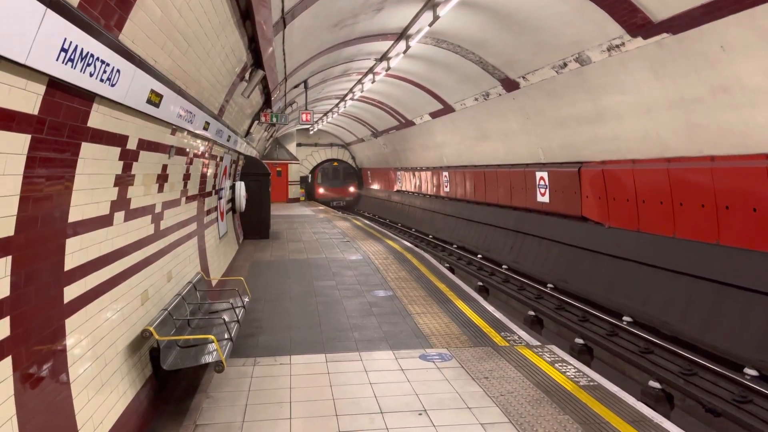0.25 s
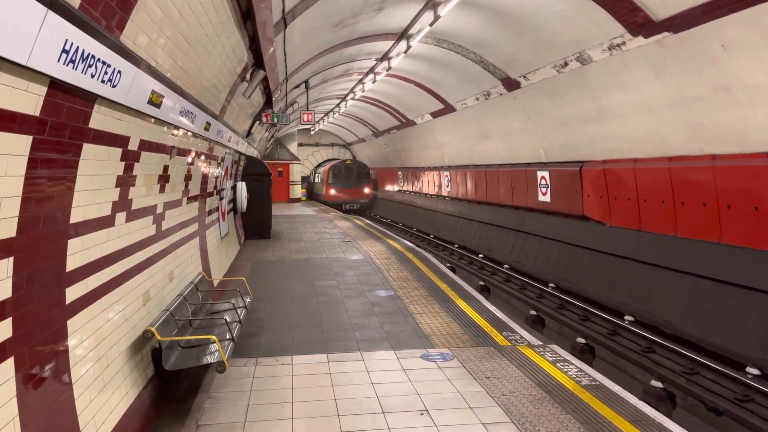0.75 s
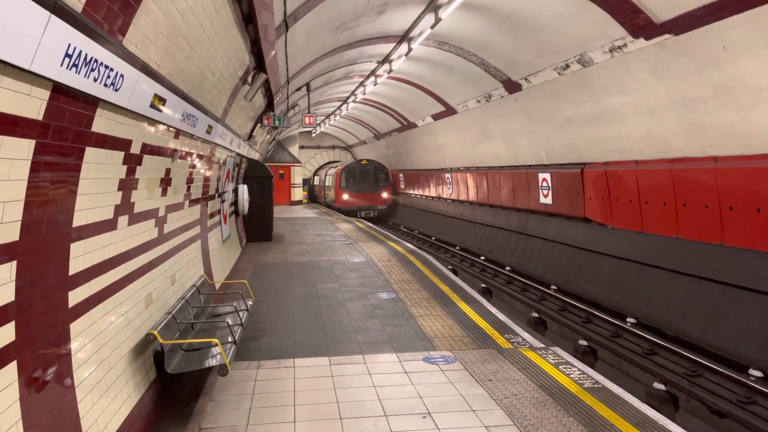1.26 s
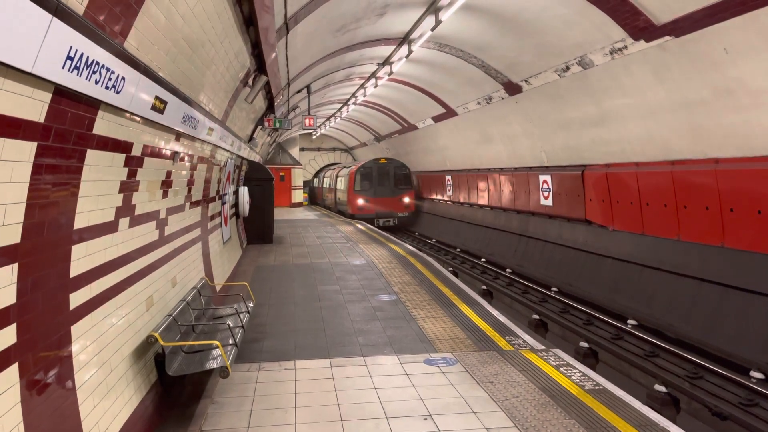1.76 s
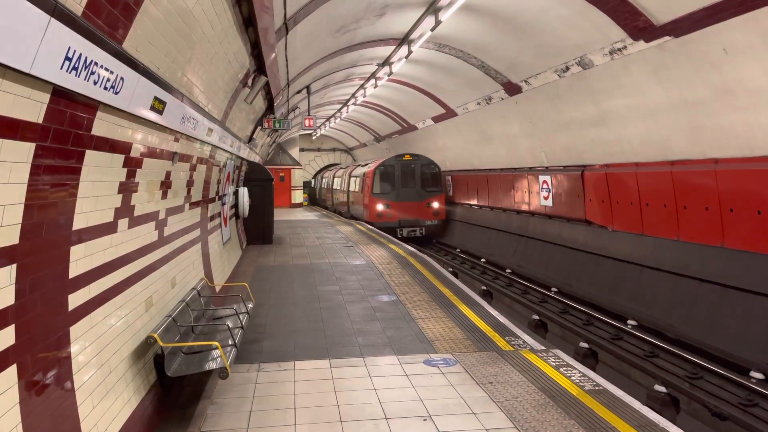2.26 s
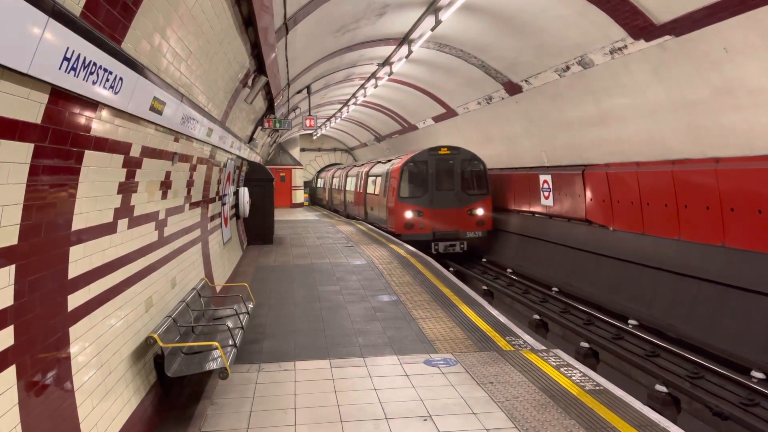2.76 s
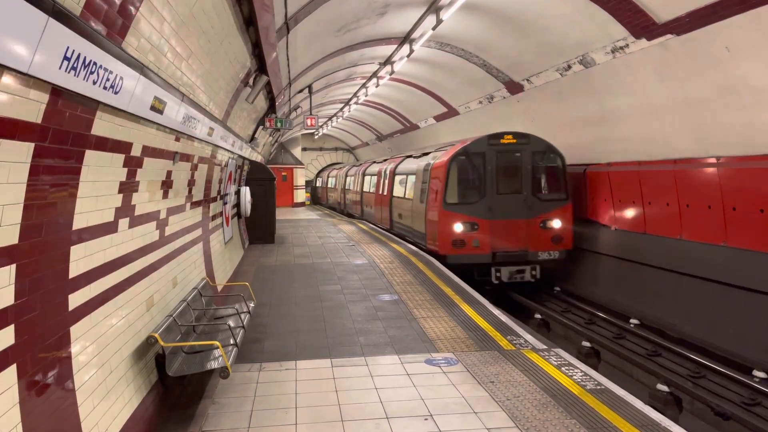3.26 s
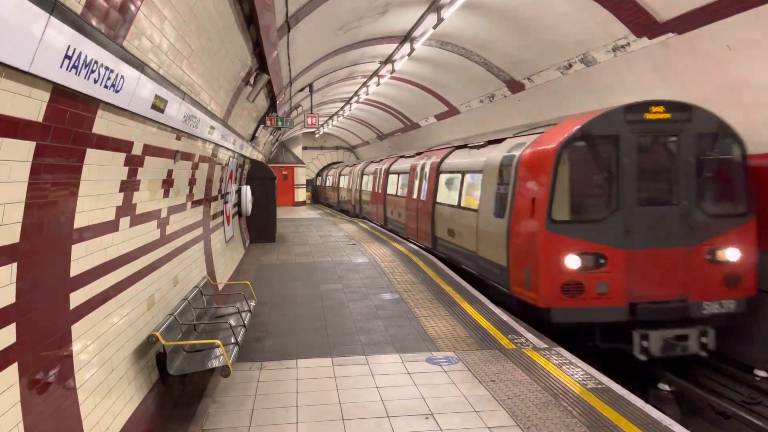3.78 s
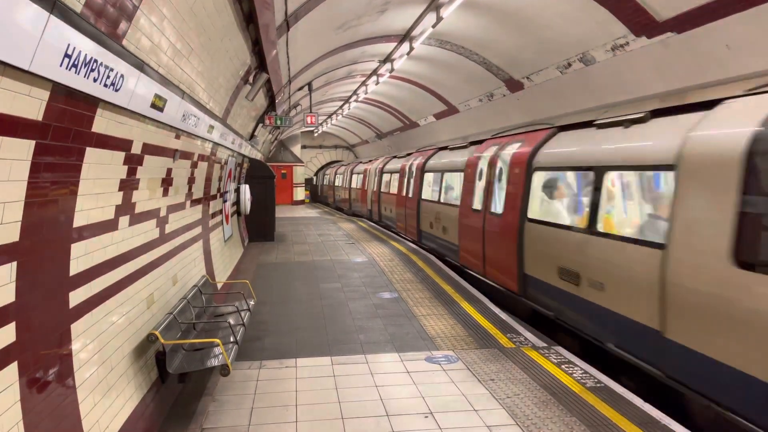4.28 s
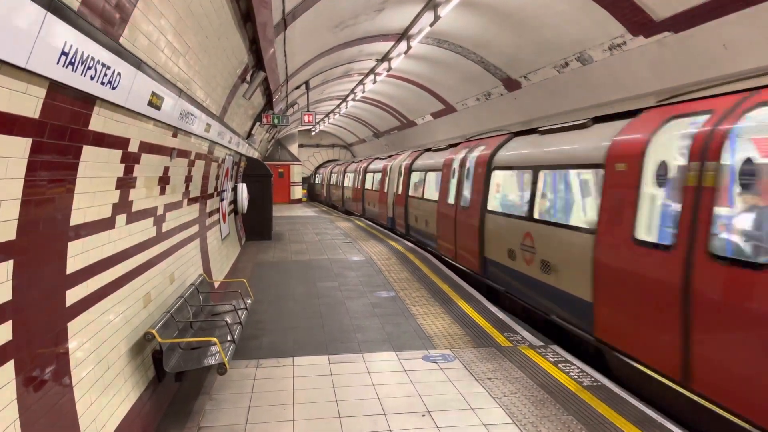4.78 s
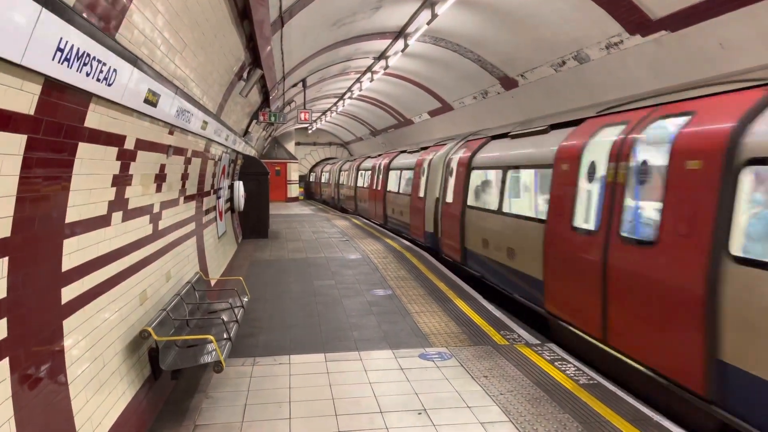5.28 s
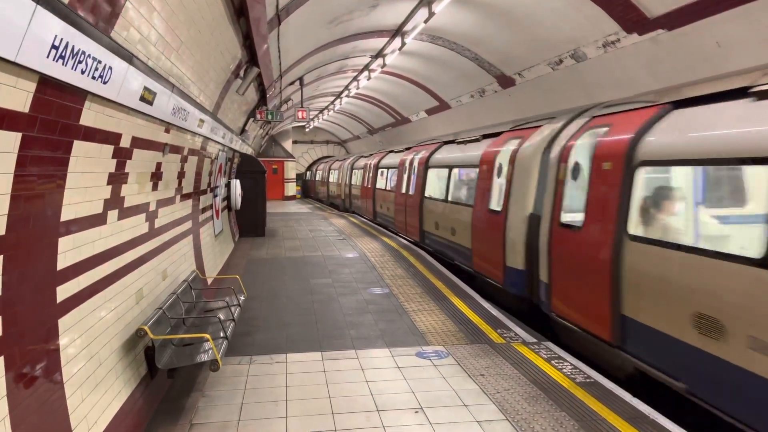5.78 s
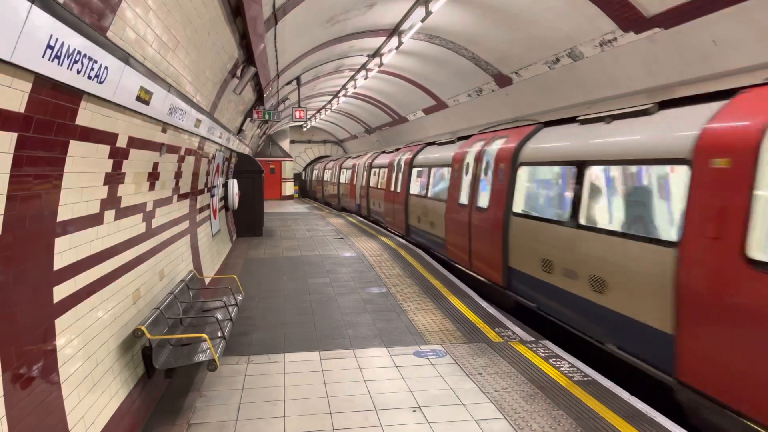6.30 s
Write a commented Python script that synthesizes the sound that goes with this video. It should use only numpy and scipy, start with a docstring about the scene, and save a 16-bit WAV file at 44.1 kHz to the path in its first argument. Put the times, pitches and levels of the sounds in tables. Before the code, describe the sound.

A subway train enters a tiled, vaulted underground platform, heard in wide stereo from the platform. At 0 s a bright burst of hissing, sizzling steel with brief rough squeals sits over deep rumble, drone and roar, and dies within about 0.2 s. Near 0.6 s a short hollow mid-pitched tone sounds, followed by small higher squeaks at 0.7 s; a softer hiss and sizzle swell from 0.9 to 1.3 s. Between 1.4 and 3 s the rumble dominates, surging unevenly, with deep gusts of pushed air, strongest near 2 s, low thuds and light brake rubs. Around 3.6 s the first car draws alongside: clatter becomes closer, and high sizzle returns from 3.8 to 4.4 s with faint squeals. From 5 to 6 s brakes hiss in short strokes, with a rough squeal at 5.5 s. Thuds and steady rolling rumble continue to the end at 6.5 s, without a stop.

```python
"""A burst of hissing steel comes first, with brief squeals, over the rumble and roar of a train.
Two microphones on a tiled, vaulted underground platform face it as it leaves its tunnel and brakes.
Shaped noise makes the draught, rumble, drone, roar, clatter and rubbing, with grit and rings added;
wavering tones in rough halos make the squeals, and short sagging tones the low thuds."""
import sys
import numpy as np
from scipy import signal
from scipy.fft import rfft, irfft
from scipy.io import wavfile
from scipy.ndimage import uniform_filter1d, minimum_filter1d

SR = 44100
rng = np.random.default_rng(int(sys.argv[2]) if len(sys.argv) > 2 else 0)


def wav_record(signal):
    """Record a signal, one row per channel, as 16-bit PCM in the file named by sys.argv[1]."""
    frames = np.transpose(np.atleast_2d(signal))
    bounded = np.clip(frames, -1, 1)
    # unit amplitude maps onto the largest positive 16-bit level
    quanta = np.round(bounded * 32767).astype(np.int16)
    wavfile.write(sys.argv[1], SR, quanta)


N = 288414
TIME = np.arange(N) / SR  # seconds

# Colours of the noises, relative density per Hz: pitch_hz, level_db
BOOM_COLOUR = [(20, -26), (32, -16.5), (44, -7), (52, -13), (62, 5)]
RUMBLE_COLOUR = [(40, -30), (52, -39), (64, -3.5), (90, -0.5), (125, -1.5), (155, -1), (185, -4),
                 (230, -9.5), (330, -79)]
DRONE_COLOUR = [(130, -54), (175, -7), (225, 1.5), (270, 0), (340, 0), (410, -2), (470, -7.5), (600, -16)]
ROAR_COLOUR = [(340, -7), (440, -5), (500, -0.5), (680, -1.5), (850, -3), (1020, -8.5), (1200, -16.5),
               (1700, -61)]
GRIT_COLOUR = [(450, -21), (650, 6), (950, -1), (1400, -6.5), (2200, -10), (3000, -24.5)]
CLATTER_COLOUR = [(800, -21), (1050, -0.5), (1200, 0), (1400, 0.5), (1560, -2), (2000, -3.5), (2450, -8.5),
                  (2750, -9), (4500, -23), (8000, -52)]
BRAKE_COLOUR = [(1800, 0), (2600, -1.5), (3100, 1), (3800, -1), (4480, -3.5), (4850, -0.5), (6000, -3.3),
                (7000, -9.5), (8200, -12.5), (9300, -11), (10000, -48), (13000, -70)]
FLANGE_COLOUR = [(3000, -17), (5500, 0.5), (7000, -3.5), (8000, -5), (8700, -5.5), (9450, 2.5), (10000, 1),
                 (10800, 5.5), (11400, -1.5), (12000, -4), (12450, -14), (12900, -29)]
SKIRT_DB_PER_OCTAVE = 40  # fall beyond the ends of a colour

# Resonances of the tunnel, the wheels, and the rolling noise far off and alongside:
# pitch_hz, width_hz, lift_db
TUNNEL_MODES = [(71, 17, 1.5), (95, 11, 3), (119.4, 69, 2.5), (176.3, 15.3, 6.5), (246, 30, 1.5),
                (354, 31, 2)]
WHEEL_MODES = [(3040, 130, 2), (3660, 130, 2), (3860, 130, 2), (4790, 140, 3.3), (5030, 70, 2),
               (5540, 150, 3.2), (5980, 170, 2.2), (6260, 70, 2.2), (7400, 200, 2), (7790, 70, 2.6),
               (8030, 90, 2.8), (9020, 60, 2.5), (9520, 200, 1.6)]
FAR_MODES = [(546, 32, 3), (688, 41, 2.5), (1040, 24, 2.2), (1366, 86, 2.5), (1760, 70, -1), (1920, 98, 2),
             (2050, 50, -0.5)]
NEAR_MODES = [(795, 40, 1.5), (840, 80, 2.7), (996, 100, 3.9), (1350, 35, 1.2), (2050, 130, 2.9),
              (2250, 70, 1.6), (2380, 140, 3.4), (2710, 55, 2.8)]
MODE_SWAY, MODE_SWAY_PER_S = .45, 5  # rms share by which resonances swell and sink; pace
ALONGSIDE_S, ALONGSIDE_BLEND_S = 3.63, 0.28  # first car draws level; how gradually

# Likeness of the diffuse sound at the two microphones: pitch_hz, likeness (-1 to 1)
LIKENESS = [(40, 0.8), (200, 0.93), (380, 0.7), (520, 0.34), (720, 0.36), (1000, 0.1), (1300, 0),
            (1600, -0.45), (2200, 0.33), (2850, -0.33), (4400, 0.3), (5250, -0.3), (6200, 0.3), (8500, 0)]
# Likeness of the treble sizzle at the two microphones: pitch_hz, likeness
SIZZLE_LIKENESS = [(5000, .1), (7000, .1), (7800, .65), (8400, .8), (8750, 1), (9200, 0.76), (9800, 1),
                   (10400, 1), (11200, 0.75), (11900, 0.9)]
# Phase by which the sizzle leads at the right microphone: pitch_hz, lead_radians
SIZZLE_LEAD = [(7000, -3), (7500, -1.8), (8000, 0), (8850, -0.2), (9300, 1.5), (9800, 3.5), (10200, 3),
               (10700, 3.5), (11200, 5.1), (11800, 7)]
# Balance of the noises between the microphones: pitch_hz, left_minus_right_db
BALANCE = [(60, 2), (350, 1.5), (900, 3), (1500, 0.5), (2000, -3.5), (2500, 1), (3500, 4), (5000, 3),
           (6800, 2.5), (9000, -0.5)]
# Time for the vault's echoes to fall 60 dB: pitch_hz, t60_s
TUNNEL_T60 = [(80, 2.8), (500, 0.33), (2000, 0.77), (8000, 0.88)]

# Gusts in the air ahead of the cars, length at half height: middle_s, length_s, lift_db
GUSTS = [(.35, 0.32, 13.5), (1.28, 0.22, 8), (1.58, .25, 6), (2.05, 0.49, 14), (2.8, 0.45, 10),
         (3.477, .15, 10), (5.49, .15, 10)]
DRAUGHT_DB = -38.5  # the steady air beneath the gusts

# The rolling train between swells, before trims: time_s, rumble_db, drone_db, roar_db
ROLLING = [(0, -23, -20.5, -26), (.85, -22.5, -18.5, -21.5), (1.08, -25.5, -21, -24),
           (1.6, -21, -19.5, -23.5), (2.6, -21, -19.5, -24.5), (3.2, -22, -22, -25), (3.7, -20, -21.5, -25),
           (4.4, -19.5, -22.5, -22), (5.0, -21.5, -22.5, -24.5), (5.7, -21, -22, -24),
           (6.54, -20, -20.5, -23.5)]
# Brief swells and dips of the rolling noise, length at half height:
# middle_s, length_s, rumble_lift_db, drone_lift_db, roar_lift_db, clatter_lift_db
ROLLING_SWELLS = [(0.035, 0.088, 3, 5, 4, 3.5), (0.373, 0.14, -1.5, 3, 3.5, 0.5),
                  (0.59, 0.18, -1.5, 3, 8, 2.5), (0.73, 0.085, 4, 1.5, 2, 3), (1.447, 0.13, -2, 3, 2, 3.5),
                  (1.832, 0.044, -3, 0.5, 4, -0.5), (1.933, 0.14, 1, 4, 6, 4.5),
                  (2.162, 0.2, 0, 1, 5.5, 5.5), (2.183, 0.033, -2, 5, 4.5, 4.5),
                  (2.47, 0.18, -0.5, 3.5, 5, 3.5), (2.713, 0.14, 1.5, 3, 5, 5),
                  (3.22, 0.15, -0.5, 0.5, -2, 1.5), (3.47, 0.19, 0, 2, 2.5, 1.5),
                  (3.924, 0.2, 1.5, 2.5, 4, 3.5), (4.193, 0.14, 1, 2, 3.5, 2.5),
                  (4.55, 0.12, -2, 2, 2, -2.5), (4.723, 0.12, 1, 3.5, 2, 2), (5.976, 0.21, 0.5, 3.5, 2, 1),
                  (6.274, 0.15, 1.5, .8, -1, 2)]
CLATTER_DB, ROAR_REF_DB = -30.5, -24  # clatter between swells when the roar is at the reference
CLATTER_FOLLOW = 0.47  # share of the roar's swings between swells, in dB, that the clatter follows
# Grit: level against the roar, grains a second, mean of their random extra size
GRIT_DB, GRIT_PER_S, GRIT_SPREAD_DB = -8, 330, 4.5
# Rings: level against the clatter, rings a second, half the range of their sizes
RING_DB, RINGS_PER_S, RING_SPREAD_DB = -7, 70, 3
RING_LOW_HZ, RING_HIGH_HZ = 850, 2561
RING_RISE_S, RING_GLIDE_PER_S = .022, .12  # time to peak; largest drift, share of pitch a second

# Brake blocks bite on the wheels, before a trim: start_s, rise_s, release_after_s, level_db
BRAKE_BITES = [(-.03, 0.062, 0.061, -26.5), (.635, 0.029, 0.048, -32.5), (.89, 0.14, 0.34, -35),
               (1.84, 0.091, 0.3, -38), (2.12, 0.038, 0.041, -32), (2.42, 0.11, 0.2, -38.5),
               (2.62, .1, 0.16, -36), (3.13, 0.037, 0.14, -43), (3.73, 0.13, 0.29, -39),
               (4.0, 0.11, 0.46, -35), (4.63, 0.11, 0.18, -39.5), (5.02, 0.064, 0.22, -35),
               (5.43, 0.052, 0.096, -32.3), (5.81, .14, 0.27, -34)]
# Light drag of the blocks between bites, before the same trim: time_s, level_db
BRAKE_DRAG = [(0, -37), (1.7, -44.5), (3.05, -44), (3.6, -41), (6.54, -40)]
# Flanges press against the rail, before a trim: start_s, rise_s, release_after_s, level_db
FLANGE_RUBS = [(-.03, 0.05, 0.061, -25.5), (.445, 0.034, 0.16, -45), (.9, 0.047, 0.31, -33),
               (1.39, 0.016, 0.032, -41), (1.76, 0.064, 0.15, -48), (2.04, 0.059, 0.072, -42),
               (2.4, 0.067, 0.15, -43.5), (2.63, 0.024, 0.12, -39), (3.07, 0.035, 0.07, -42),
               (3.33, 0.023, 0.07, -44.5), (3.5, 0.1, 0.18, -40), (3.76, 0.021, 0.041, -38),
               (3.88, 0.055, .42, -32), (4.07, 0.033, 0.05, -37), (4.24, .04, 0.08, -34),
               (4.55, 0.056, 0.5, -43), (4.98, 0.046, 0.2, -36), (5.31, 0.027, 0.17, -35.5),
               (5.43, 0.06, 0.083, -34), (5.72, 0.056, 0.19, -37), (5.85, 0.079, 0.13, -37),
               (6.38, 0.044, 0.075, -36.5)]
# Light touch of the flanges between rubs, before the same trim: time_s, level_db
FLANGE_DRAG = [(0, -61), (3.0, -57), (6.54, -47)]
BRAKE_FADE_DB_PER_S, FLANGE_FADE_DB_PER_S = 55, 79
WAVER_DB, WAVER_PER_S = 1.5, 22  # random wavering of the sizzle's level: rms depth, pace
# Rms depth of the drifting patches in each noise
ROAR_PATCHY_DB, CLATTER_PATCHY_DB, HISS_PATCHY_DB, SIZZLE_PATCHY_DB = 1.8, 1.7, 1.9, 2.8

# Wheels sing out, level before trim and panning:
# peak_s, rise_s, fade_s, pitch_hz, width_hz, level_db, clean_share (of the power)
SQUEALS = [(.04, .04, .064, 2980, 90, -45, .2), (.04, .04, .05, 5440, 80, -41, .3),
           (.06, .06, 0.11, 4820, 100, -37.5, 0.2), (.04, .03, .04, 5030, 60, -40, .3),
           (.05, .04, 0.12, 4150, 300, -41, 0), (.595, 0.045, .035, 547, 25, -20, 0.9),
           (.675, .022, 0.034, 2100, 80, -33.5, .5), (.735, .012, 0.014, 1933, 110, -27, .4),
           (.92, .013, 0.034, 9420, 60, -47, .4), (.93, .015, .035, 6660, 60, -48, .5),
           (2.5, .04, .055, 6230, 70, -51, .4), (2.73, .036, .036, 5230, 60, -48, .4),
           (3.22, .06, .08, 3560, 380, -44, 0), (3.8, 0.094, 0.093, 5420, 125, -40, 0.2),
           (4.35, 0.071, .14, 2450, 54, -42, .2), (5.12, .05, 0.045, 3850, 110, -43, .15),
           (5.5, 0.04, 0.036, 3600, 170, -38, .05)]
CORE_WAVER = .25  # rms waver of a squeal's clean tone, as a share of its width
# Low thuds and swells in the rumble, level before a trim, pitch one fade time in:
# start_s, level_db, pitch_hz
THUDS = [(.3, -14.5, 316), (0.304, -14.5, 233), (0.648, -15, 91.5), (1.215, -15, 118), (1.44, -12.5, 89.6),
         (2.021, -16, 90), (2.095, -11.5, 119), (2.78, -17, 181), (2.98, -16.5, 179.3), (3.46, -16.5, 125),
         (3.86, -12.5, 175), (3.959, -16.5, 89), (4.765, -13, 106.7), (5.565, -13, 128), (6.22, -18.5, 169),
         (6.29, -14, 90)]
THUD_ECHO_DB, THUD_SAG_PER_S = -15, .7  # vault's answer; share of the pitch lost a second

CEILING, EDGE_HZ = .95, 12931  # limiter's peak level (full scale 1); top of the band


def gain_of(db):
    """Decibels to gain."""
    return 10 ** (np.asarray(db) / 20)


def evened(x):
    """Scales to rms 1."""
    return x / np.sqrt(np.mean(x ** 2) + 1e-20)


def read(points, hz):
    """Reads a spectrum on a log-frequency axis."""
    f, value = np.transpose(points)
    return np.interp(np.log(hz + 1), np.log(f), value)


def shade(colour, hz):
    """A colour in dB, falling away steeply beyond its first and last point."""
    octaves = np.log2((hz + 1) / np.clip(hz + 1, colour[0][0], colour[-1][0]))
    return read(colour, hz) - SKIRT_DB_PER_OCTAVE * abs(octaves)


def levels(table):
    """The dB columns of a curve as gains, sample by sample."""
    s, *columns = np.transpose(table)
    return [gain_of(np.interp(TIME, s, c)) for c in columns]


def swell(s, length):
    """A smooth bump of height 1 around s, as wide as length at half height."""
    return .5 ** ((2 * (TIME - s) / length) ** 2)


def wander(rate):
    """Slow random curve of about rms 1, its changes fading out above the given rate a second."""
    size = 2 ** 15
    hz = np.fft.rfftfreq(size, TIME[-1] / size)
    slow = irfft(rfft(rng.standard_normal(size)) * np.exp(-(hz / rate) ** 2))
    return evened(np.interp(TIME, np.linspace(0, TIME[-1], size), slow))


def unlike(first, second, same):
    """Mixes two independent spectra into one that resembles the first by the given likeness."""
    return same * first + np.sqrt(1 - same ** 2) * second


def pair(colour, modes, likeness, lead=((1000, 0),), patchy_db=1., sway=0, size=2048):
    """Resonant noise with drifting patches at two microphones; their mean has rms 1."""
    frames, hz = N * 4 // size + 5, np.fft.rfftfreq(size, 1 / SR)
    a, b, c, d, patches = rng.standard_normal((frames, len(hz), 5)).T
    same = np.clip(read(likeness, hz), -1, 1)[:, None]
    left = a + 1j * b
    right = unlike(left, c + 1j * d, same) * np.exp(1j * read(lead, hz))[:, None]
    side = gain_of(read(BALANCE, hz) / 2)[:, None]

    # each resonance swells and sinks on its own
    sway_frames = round(frames / TIME[-1] / MODE_SWAY_PER_S)
    chance = rng.standard_normal((len(modes), frames))
    drive = 1 + sway * evened(uniform_filter1d(chance, sway_frames))
    peaks = [db / (1 + (2 * (hz - f) / width) ** 2) for f, width, db in modes]
    lift_db = np.transpose(peaks) @ drive

    # smoothed over 5 frequency bins, then 12 frames
    patches = uniform_filter1d(patches, size=5, axis=0)
    patches = evened(uniform_filter1d(patches, size=12, axis=1))
    level_db = shade(colour, hz)[:, None] + lift_db + patchy_db * patches
    z = np.array([left * side, right / side]) * gain_of(level_db)
    x = signal.istft(z, nperseg=size, noverlap=size * 3 // 4)[1][:, :N]
    return x / x.mean(0).std()


def tunnel(x):
    """The tiled vault: sparse echoes of random sign, dying at a pace set by frequency."""
    taps = rng.choice([-1., 1.], (2, SR)) * (rng.random((2, SR)) < 2000 / SR)  # 2000 a second
    hz, t, z = signal.stft(taps, SR, nperseg=256)
    same = np.clip(read(LIKENESS, hz), -1, 1)[:, None]
    z = np.array([z[0], unlike(z[0], z[1], same)])
    decay = np.exp(-np.log(1000) * t / read(TUNNEL_T60, hz)[:, None])
    tail = signal.istft(z * decay, SR, nperseg=256)[1]
    return signal.fftconvolve(x[None], tail / np.linalg.norm(tail[0]), axes=1)[:, :N]


def draught():
    """The train drives air through the tube like a piston: a deep, uneven boom."""
    push = gain_of(DRAUGHT_DB + sum(db * swell(s, length) for s, length, db in GUSTS))
    return push * pair(BOOM_COLOUR, TUNNEL_MODES, LIKENESS, patchy_db=2.4, size=8192)


def nearing(colour, patchy_db, size):
    """Rolling noise whose resonances change from far to near as the first car draws level."""
    near = (1 + np.tanh((TIME - ALONGSIDE_S) / ALONGSIDE_BLEND_S)) / 2
    out = 0
    for share, modes in ((1 - near, FAR_MODES), (near, NEAR_MODES)):
        noise = pair(colour, modes, LIKENESS, patchy_db=patchy_db, sway=MODE_SWAY, size=size)
        out = out + np.sqrt(share) * noise
    return out


def grit():
    """Pits and grains tick under the treads, hundreds a second, blurred by the vault."""
    hits = (rng.random(N) < GRIT_PER_S / SR) * rng.choice([-1, 1], N)
    ticks = hits * gain_of(GRIT_SPREAD_DB * np.minimum(rng.exponential(1, N), 4))
    x = irfft(rfft(ticks) * gain_of(shade(GRIT_COLOUR, np.fft.rfftfreq(N, 1 / SR))), N)
    return gain_of(GRIT_DB) * evened(0.56 * x + tunnel(x))


def rings():
    """Knocks set wheels and rails ringing briefly at scattered pitches that drift a little."""
    t = np.arange(SR // 4) / SR
    out = np.zeros((2, N + SR))
    shape = t / RING_RISE_S * np.exp(-t / RING_RISE_S)
    knocks = rng.random((round(RINGS_PER_S * TIME[-1]), 6))
    for when, pitch, glide, strength, *phases in knocks:  # one phase for each microphone
        hz = RING_LOW_HZ * (RING_HIGH_HZ / RING_LOW_HZ) ** pitch
        drift = 1 + RING_GLIDE_PER_S * (glide - .5) * t
        angle = 2 * np.pi * (hz * t * drift + np.array(phases)[:, None])
        ring = gain_of(RING_SPREAD_DB * 2 * strength) * shape * np.sin(angle)
        out[:, int(when * N):][:, :len(t)] += ring
    return gain_of(RING_DB) * evened(out[:, :N])


def rolling():
    """Car bodies rumble and drone, changing in brief swells; roar and clatter jolt together."""
    rumble, drone, roar = levels(ROLLING)
    clatter = gain_of(CLATTER_DB) * (roar / gain_of(ROAR_REF_DB)) ** CLATTER_FOLLOW
    lift_db = sum(np.outer(lifts, swell(s, length)) for s, length, *lifts in ROLLING_SWELLS)
    rumble, drone, roar, clatter = [rumble, drone, roar, clatter] * gain_of(lift_db)
    jolts = wander(rate=28)
    low = rumble * pair(RUMBLE_COLOUR, TUNNEL_MODES, LIKENESS, patchy_db=0.0, size=8192)
    body = drone * pair(DRONE_COLOUR, TUNNEL_MODES, LIKENESS, patchy_db=0.5, size=4096)
    wheels = roar * (nearing(ROAR_COLOUR, ROAR_PATCHY_DB, size=4096) + grit())
    rail = clatter * (nearing(CLATTER_COLOUR, CLATTER_PATCHY_DB, size=2048) + rings())
    steady = gain_of(0.5) * low + body
    return steady + wheels * gain_of(1.17 * jolts - 0.12) + rail * gain_of(0.33 * jolts)


def contacts(table, drag, fade_db_per_s):
    """Gain of a rubbing contact: each touch rises, holds and dies away, over a light drag."""
    power = levels(drag)[0] ** 2
    for s, rise, release, db in table:
        t = TIME - s
        fade_db = fade_db_per_s * np.maximum(t - release, 0)
        touch = np.clip(t / rise, 0, 1) * gain_of(db - fade_db)
        power = power + touch ** 2
    return np.sqrt(power)


def rubbing():
    """Brake blocks hiss and flanges sizzle: noise through the wheels' swaying resonances."""
    brake = contacts(BRAKE_BITES, BRAKE_DRAG, BRAKE_FADE_DB_PER_S)
    flange = contacts(FLANGE_RUBS, FLANGE_DRAG, FLANGE_FADE_DB_PER_S)
    hiss = brake * pair(BRAKE_COLOUR, WHEEL_MODES, LIKENESS,
                        patchy_db=HISS_PATCHY_DB, sway=MODE_SWAY)
    sizzle = flange * pair(FLANGE_COLOUR, WHEEL_MODES, SIZZLE_LIKENESS, lead=SIZZLE_LEAD,
                           patchy_db=SIZZLE_PATCHY_DB, sway=MODE_SWAY)
    waver = gain_of(WAVER_DB * wander(rate=WAVER_PER_S))
    return gain_of(-0.07) * hiss + gain_of(-0.95) * sizzle * waver


def squeals():
    """Rubbing drives one wheel mode: a wavering tone in a rough halo that swells and dies."""
    out = np.zeros(N)
    for s, rise, fade, hz, width, db, clean in SQUEALS:
        clean = np.clip(clean, 0, 1)
        envelope = np.exp(-((TIME - s) / np.where(TIME < s, rise, fade)) ** 2 / 2)
        angle = 2 * np.pi * hz * TIME
        waver_turns = np.cumsum(CORE_WAVER * width * wander(rate=width)) / SR
        core = np.sqrt(2) * np.sin(angle + 2 * np.pi * waver_turns)
        halo = wander(rate=width) * np.cos(angle) + wander(rate=width) * np.sin(angle)
        out += gain_of(db) * envelope * (np.sqrt(clean) * core + np.sqrt(1 - clean) * halo)
    leftward = gain_of([[1.5], [-1.5]])
    return gain_of(2.0) * (out + tunnel(out) / 2) * leftward


def thuds(rise=0.0094, fade=0.049):
    """A brief low boom, sagging in pitch, with a faint answer from the vault."""
    out = np.zeros(N)
    for s, db, hz in THUDS:
        t = np.maximum(TIME - s, 0)
        turns = hz * t * (1 - THUD_SAG_PER_S * (t / 2 - fade))
        envelope = (1 - np.exp(-t / rise)) * np.exp(-t / fade)
        out += gain_of(db) * envelope * np.sin(2 * np.pi * turns)
    return gain_of(6.0) * (out + gain_of(THUD_ECHO_DB) * tunnel(out))


def scene():
    """The whole train as heard from the platform."""
    return draught() + rolling() + rubbing() + squeals() + thuds()


def record(dry):
    """A quick limiter holds the highest peaks under the ceiling; then the treble is cut off."""
    room = np.minimum(1, CEILING / (abs(dry).max(0) + 1e-9))
    held = dry * uniform_filter1d(minimum_filter1d(room, size=441), size=441)
    low_pass = signal.firwin(511, EDGE_HZ, window=("kaiser", 9), fs=SR)
    return signal.oaconvolve(held, low_pass[None], "same")


dry = scene()
out = record(dry)
wav_record(out)
```